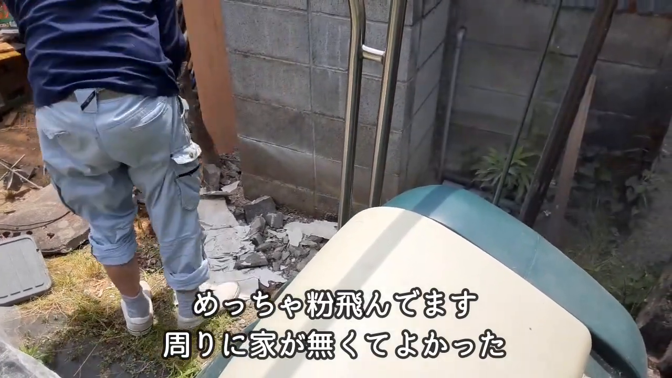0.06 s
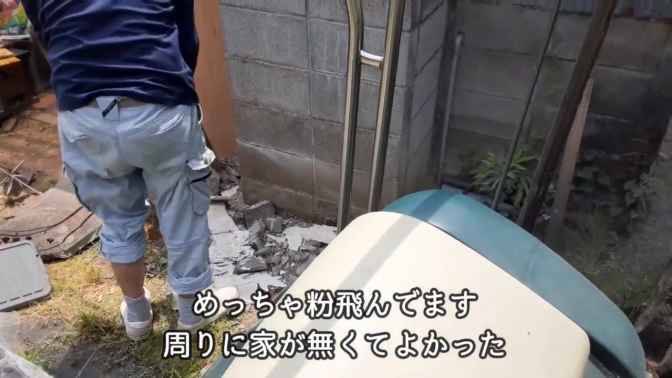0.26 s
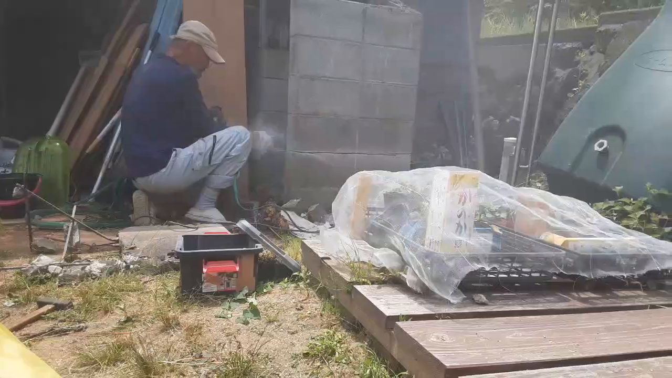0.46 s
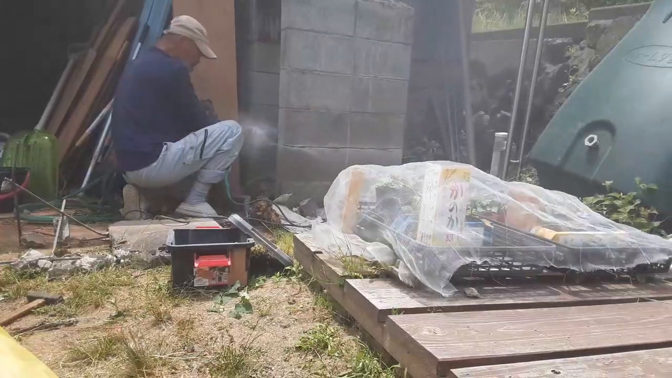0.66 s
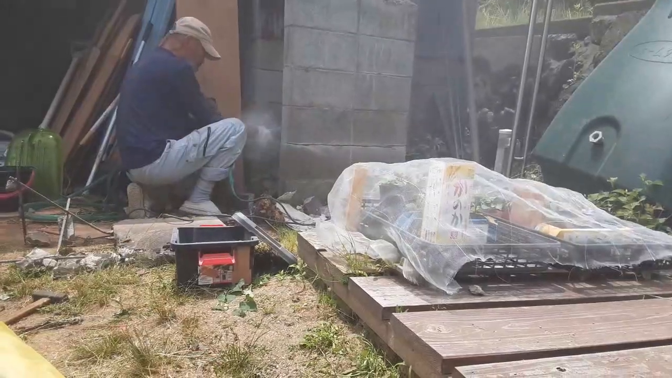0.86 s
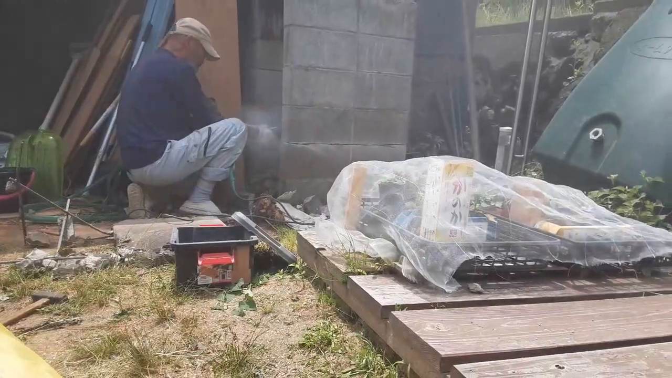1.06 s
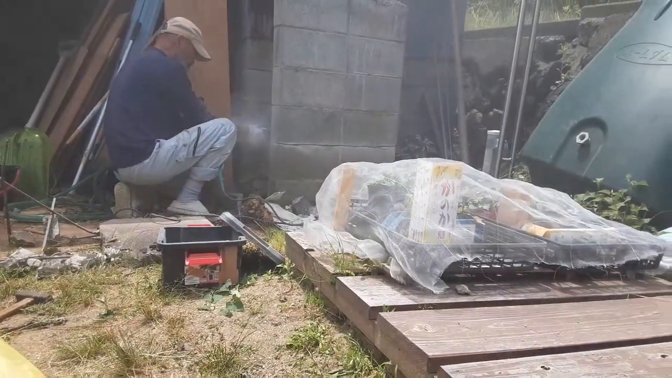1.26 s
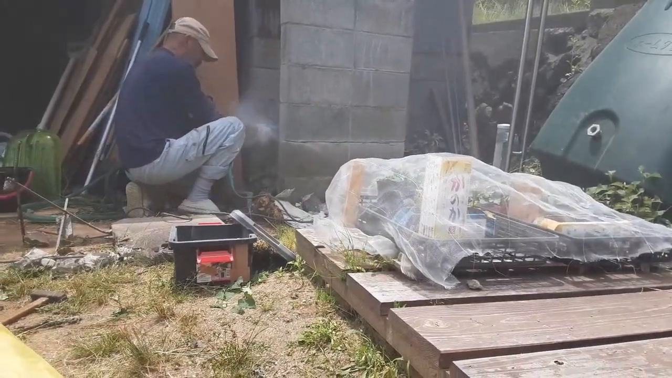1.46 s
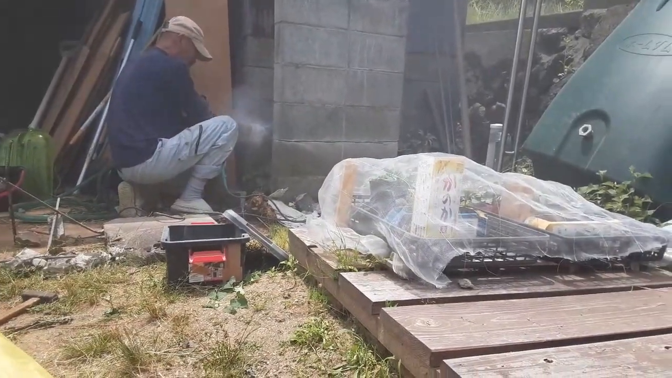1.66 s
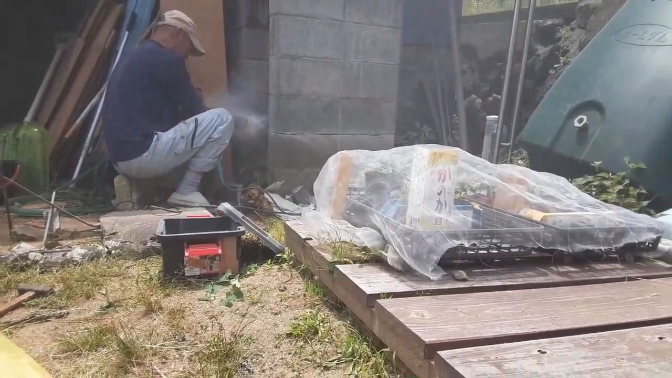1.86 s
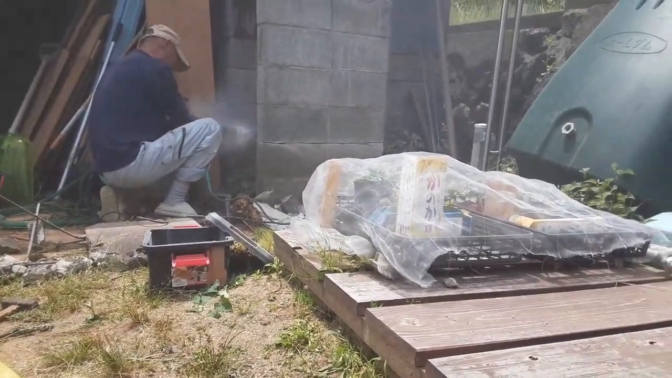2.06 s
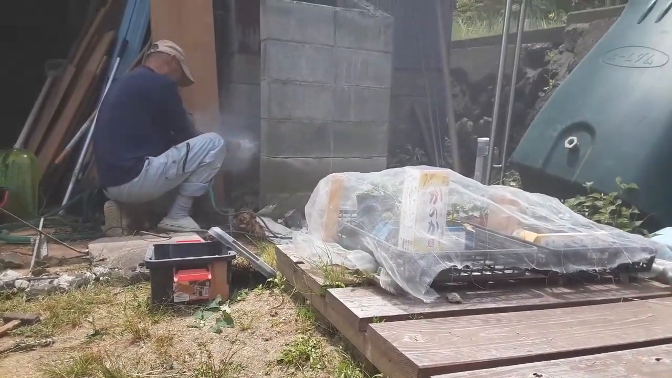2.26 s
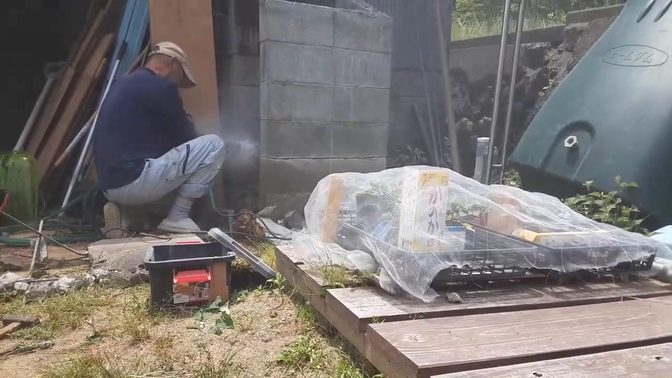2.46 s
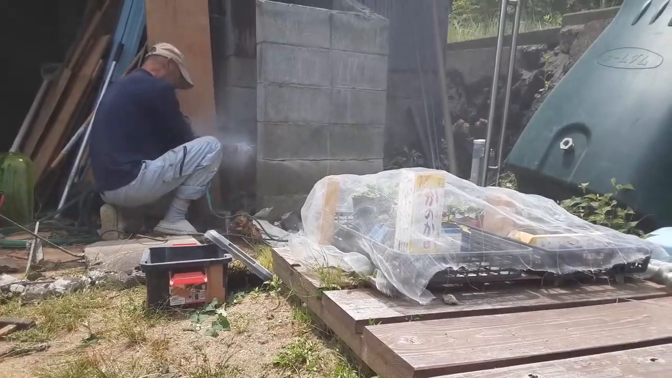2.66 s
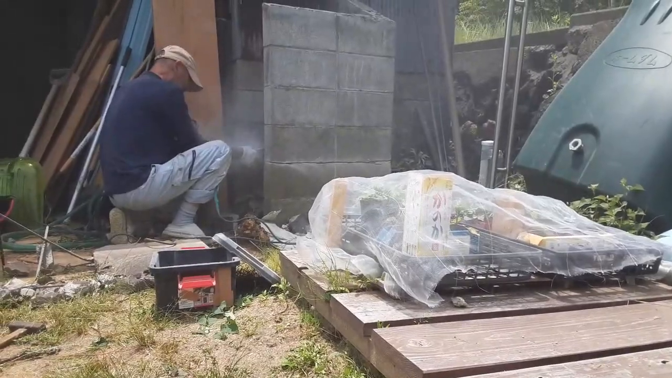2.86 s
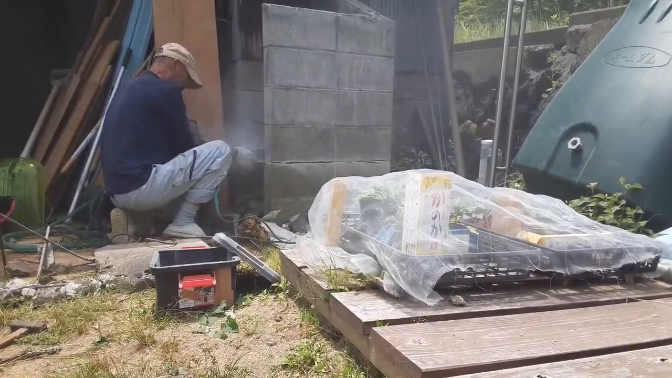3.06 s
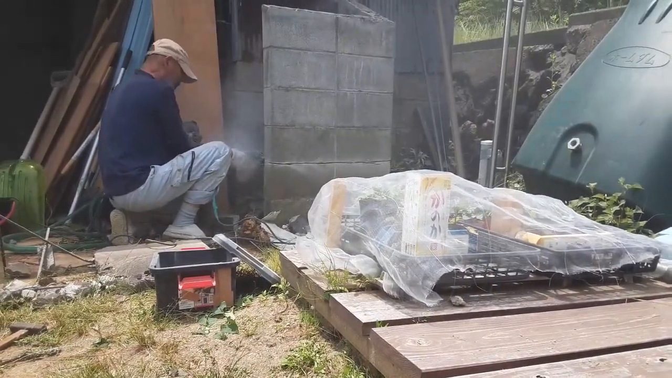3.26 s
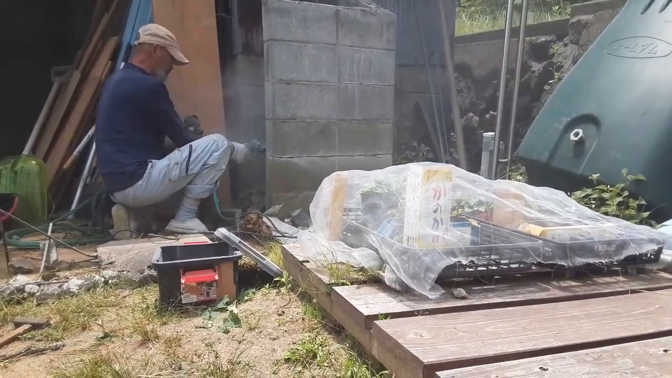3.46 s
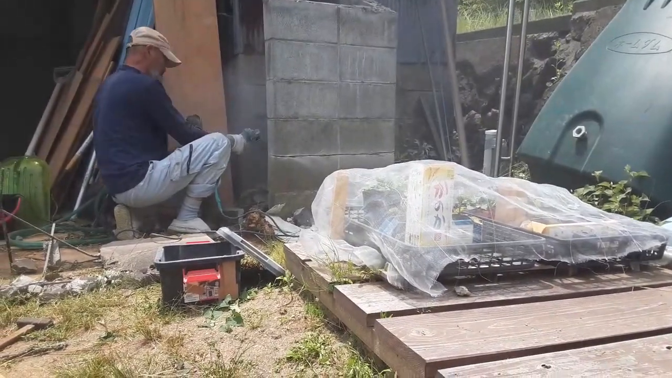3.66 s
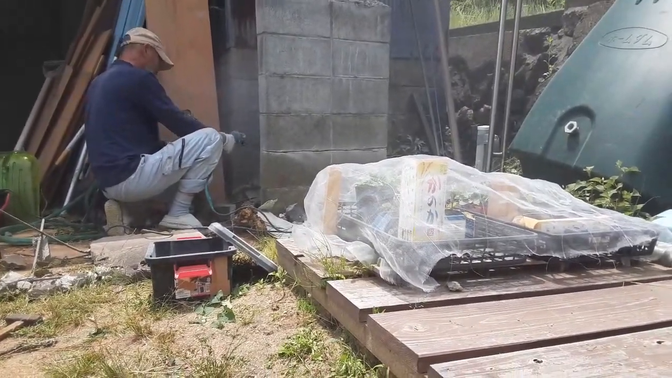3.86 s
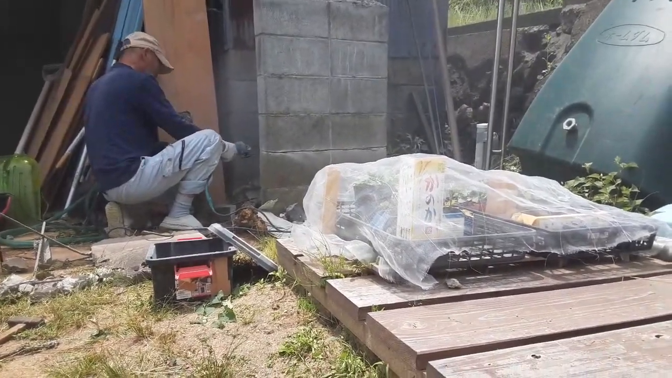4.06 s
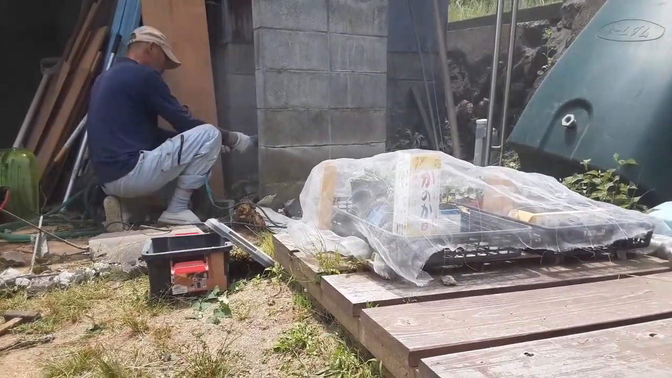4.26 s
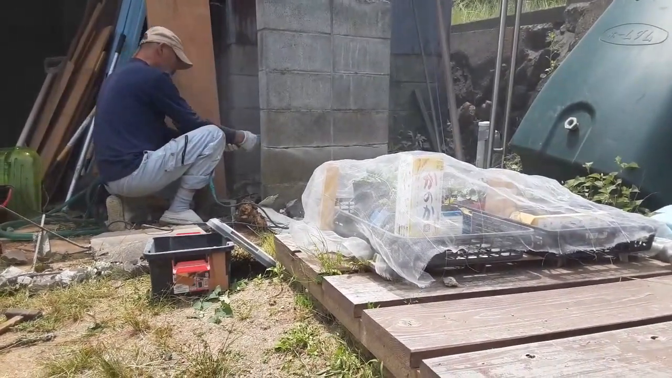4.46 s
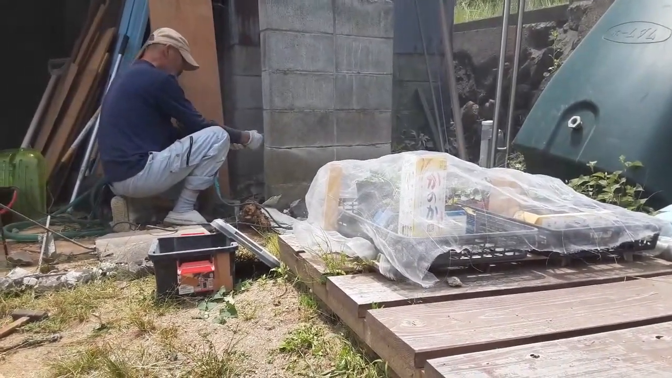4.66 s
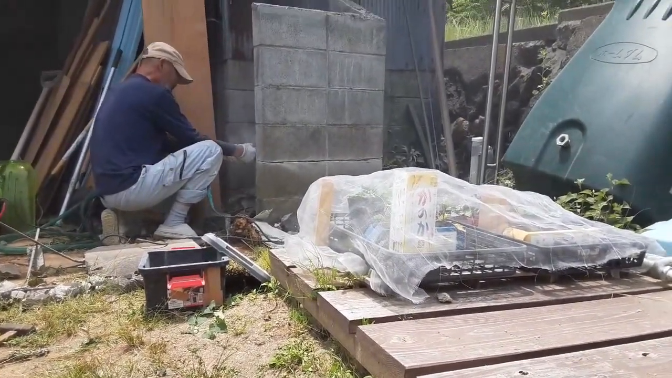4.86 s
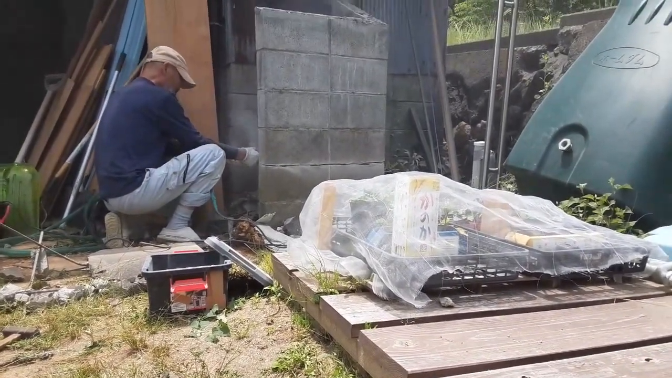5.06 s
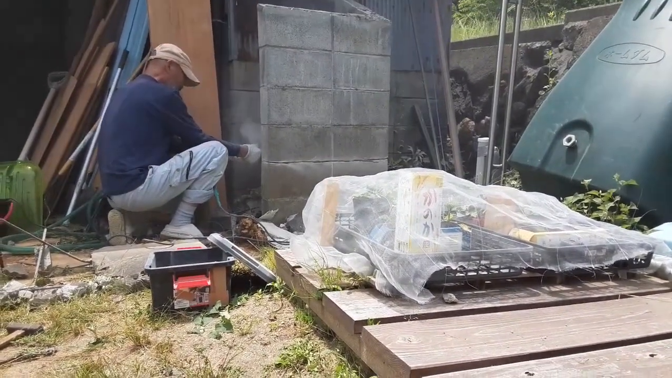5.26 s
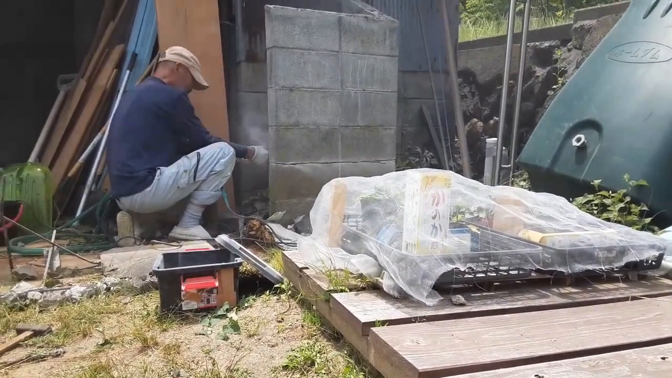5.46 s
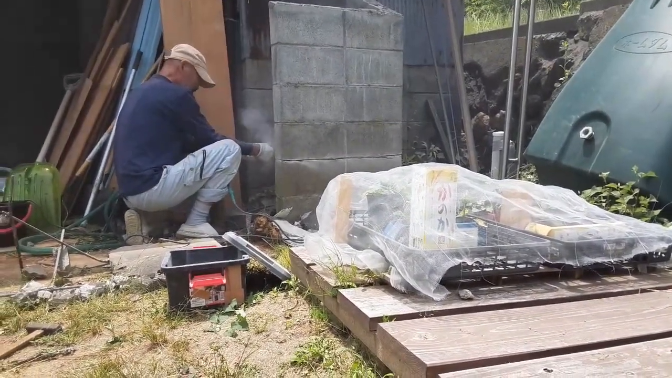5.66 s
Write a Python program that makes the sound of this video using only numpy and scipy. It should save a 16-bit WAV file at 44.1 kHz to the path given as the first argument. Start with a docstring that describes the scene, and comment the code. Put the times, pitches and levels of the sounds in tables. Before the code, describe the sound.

An electric angle grinder spins freely with a rush of fan air and a high whine, over a steady low electrical hum. At about 0.5 seconds the sound dips for an instant and the disc bites sharply into a concrete block wall. The motor slows and a harsh, bright, gritty hiss with metallic ringing carries on until about 3.3 seconds, with thin squeals near 0.6, 1.3 and 3.1 seconds. The disc lifts out, and the hum stops with a click at about 3.6 seconds. The grinder speeds up in a quieter rush of air and rising whine. Around 4.4 to 4.6 seconds it grazes the wall three times, then bites again, slowing, squealing and shuddering slightly as it grinds on to the end at about 5.7 seconds. The tool is heard from across an outdoor yard, with weak, short reflections from the walls.

```python
"""An angle grinder cuts a concrete block wall across a yard: the loaded disc slows, rings and sprays grit. It
squeals where it binds in the slot, and the tool shakes as it is pressed in. The disc lifts out, spins up in a
rush of fan air and motor whine, grazes the wall three times and bites again. A bed of mains hum lies under the
first part and stops with a click."""
import sys
import numpy as np
from scipy import signal
from scipy.fft import rfft, irfft, next_fast_len
from scipy.io import wavfile
from scipy.ndimage import uniform_filter1d, map_coordinates

SR = 44100
rng = np.random.default_rng(int(sys.argv[2]) if len(sys.argv) > 2 else 0)


def materialize(psi):
    """Save the field psi as 16-bit PCM at rate SR to the path in sys.argv[1].

    A 1-D psi becomes a single channel; in a 2-D psi each row is a channel.
    """
    bounded = np.clip(np.atleast_2d(psi).T, -1, 1)
    quanta = np.round(bounded * 32767).astype(np.int16)
    wavfile.write(sys.argv[1], SR, quanta)


N = 251674
T = np.arange(N) / SR

# The motor races when free and sags under load: (time [s], disc speed [turns/s])
DISC_SPEED = [(0, 186), (.44, 196), (.47, 118), (.8, 118), (.95, 128.4), (2.2, 110), (2.8, 119),
              (3.25, 101), (3.42, 131), (3.58, 160), (3.78, 175), (4.05, 186), (4.3, 194), (4.7, 195),
              (5, 152), (5.2, 131), (5.45, 120)]
# The disc is pushed into the wall:
# (start [s], attack [s], let go [s], release [s], low-mode drive [dB], grit spray [dB])
WALL_CUTS = [(.462, 0.015, 0.73, 0.16, -43, -45), (.6, 0.59, 3.292, 0.13, -44, -42.5),
             (4.62, 0.11, 5.8, .1, -46.2, -43.1)]
# The rim knocks, grazes or meets a hard stone:
# (peak time [s], half-width [s], low-mode drive [dB], grit spray [dB])
RIM_TOUCHES = [(0.471, .006, -34, -44.5), (2.047, 0.017, -54, -60), (3.456, .003, -42.5, -60),
               (4.436, .025, -46, -45.5), (4.547, 0.011, -45, -44), (4.632, 0.021, -46.5, -45.5),
               (4.82, 0.018, -43, -53), (4.898, 0.017, -58, -49)]
# Modes of the steel disc:
# (pitch [Hz], width with waver [Hz], level [dB], left-right [dB], pitch shift [Hz per turn/s])
DISC_MODES = [(2046, 150, -8, 0, 0), (2873, 90, -16, 4.5, -2.5), (3360, 130, -11, 3, 0),
              (3843, 150, -13, 17.5, -1), (4570, 180, -12, 10.5, 1), (5064, 69, -5, -4.5, 0),
              (5845, 72, -10, -19, -3), (6528, 142, 1.5, -3.5, 4), (7597, 130, -7.5, 11.5, -3),
              (8550, 46, -7, 13.5, 3.5), (9830, 160, -9, 9.5, -5.5), (11030, 87, -5, 13.5, 4),
              (11980, 390, -4, 1, 2.5), (12560, 78, -7.5, 7, -0.5), (14130, 100, -4, 7, -4),
              (14800, 310, -4.5, 8, 3), (15440, 200, -5, 12, 4)]
# Colour of the flying grit: (frequency [Hz], relative level [dB], left-right [dB])
GRIT_SPECTRUM = [(60, -34, 0), (196.16, -15.5, 3), (795, -23, 6), (1340, -10.5, 3.5), (2300, -4.5, -1.5),
                 (3600, -2, -1), (4100, -4, 5.5), (5050, 0, -3.5), (5520, -10.5, -16), (7000, -5, -4),
                 (8200, -9, 11), (9400, -12.5, 9), (10550, -5, -4), (11700, -2, 1), (13100, -10.5, 5.5),
                 (14400, -2, 13), (15500, -10.5, 1)]
# The disc binds in the slot: (start [s], end [s], pitch [Hz], level [dB], left-right [dB])
DISC_SQUEALS = [(0.456, 0.868, 6476, -41.5, -12), (.58, .79, 4980, -46.5, 2), (1.27, 1.442, 4570, -49.5, 5),
                (1.3, 1.417, 3020, -49.5, 1), (3.02, 3.348, 6420, -47, -10), (2.95, 3.425, 5100, -51, -3),
                (4.38, 4.9, 7450, -61, 12), (4.62, 5, 9700, -54, 10), (4.68, 4.95, 5150, -52.5, -5),
                (4.749, 5.8, 4490, -51, 3), (4.92, 5.6, 5020, -49.5, -5), (5.198, 5.661, 2204, -52.5, 1)]
# The disc spins clear of the slot:
# (start [s], attack [s], back in [s], release [s], air boost [dB], whine boost [dB])
FREE_SPINS = [(-.03, 0.24, 0.48, 0.023, 8.8, 13), (3.88, .27, 4.36, 0.9, 10, 1)]
# Colour of the fan air: (frequency [Hz], relative level [dB], left-right [dB])
FAN_SPECTRUM = [(68, -27, 5), (172, -22.5, -2), (430, -21.5, -1), (670, -14, 1), (874, -12, 3),
                (1013, -5, 0), (1960, -1.8, 2.5), (2830, -1, -4), (3650, -7, 8), (5500, -6.5, -10.5),
                (6900, -4.5, 1), (7840, -13.5, 14.5), (10000, -14, 5.5), (10800, -10.5, 5),
                (13000, -14.5, 6), (15200, -14, 5.5)]
# Housing resonances blown by the fan: (pitch [Hz], width [Hz], level against the air [dB])
HOUSING_MODES = [(1296, 40, -17), (1690, 90, -21.5), (2974, 40, -14.5)]
# Partials of the buzz: (harmonic [multiple of mains frequency], relative level [dB])
MAINS_HARMONICS = [(1, 3.5), (2, -28.5), (3, -15), (4, -34), (5, -26), (6, -52), (7, -38.5), (8, -53),
                   (9, -41.5), (10, -48), (11, -41), (12, -48.5), (13, -40.5)]
# Colour of the rumble on the line: (frequency [Hz], relative level [dB])
LINE_RUMBLE_SPECTRUM = [(8, -23), (20, -4), (45, -2), (100, -8.5), (200, -16.5), (400, -20), (1000, -24),
                        (4000, -33.5)]

FREE_SPEED, CUT_SPEED = 198, 120  # disc turns/s with no load and in a steady cut
MAINS_HZ, HUM_OFF_S = 59.98, 3.5705


def cutting(speed, firm_spray_db=-38.5):
    """Grains of concrete hiss away and keep the steel disc ringing."""
    low, spray = rim_contact()
    load = np.clip((FREE_SPEED - speed) / (FREE_SPEED - CUT_SPEED), 0, 1)
    # the rim chatters in the slot and rubs a little harder once a turn
    chatter = amp(0.58 * wobble(55) + 0.41 * wobble(700)) * (1 + 0.028 * np.sin(angle(speed)))
    # uneven stone tugs at the speed, which bends all modes together
    tug = speed - CUT_SPEED + 3 * wobble(7)
    ring = np.zeros((2, N))
    for hz, width, db, pan_db, shift in DISC_MODES:
        spray_share = np.interp(hz, [6600, 8400], [0, 1]) if hz > 4700 else .6
        drive = low ** (1 - spray_share) * spray ** spray_share * amp(2.1 * wobble(12))
        # waves running with the spin rise in pitch, those running against it fall
        pitch = hz + shift * tug
        # deep in the slot the modes waver, which makes up half of their width
        waver = (.4 + .6 * load) * (20 * wobble(6) + 20 * wobble(45))
        ring += amp(db) * sides(pan_db) * drive * ringing(pitch + waver, width / 2)
    # a light graze mostly rings; a deep cut throws grit
    grit_gain = low ** 0.32 * spray ** 0.62 * amp(-3 * (1.5 - load))
    grit = grit_gain * stone_patches(rush(GRIT_SPECTRUM), depth_db=1.98)
    depth = np.minimum(spray / amp(firm_spray_db), 1) ** 0.26
    return chatter * (amp(-4) * ring + amp(3) * depth * grit)


def rim_contact(surge_db=0.9, surge_hz=12):
    """How hard the rim shakes the disc and how much grit it throws; both surge with the uneven stone."""
    force = sum(amp([[low_db], [spray_db]]) * envelope(*timing)
                for *timing, low_db, spray_db in WALL_CUTS)
    force *= amp(surge_db * np.array([wobble(surge_hz), wobble(surge_hz)]))
    for peak, half_width, low_db, spray_db in RIM_TOUCHES:
        force += amp([[low_db], [spray_db]]) * np.exp(-.5 * ((T - peak) / half_width) ** 2)
    return force


def stone_patches(grit, depth_db, bins=5, frames=12):
    """Pebbles and soft mortar pass the rim: short patches of the spectrum swell and fade."""
    spectrum = signal.stft(grit, nperseg=512)[2]
    patches = uniform_filter1d(rng.standard_normal(spectrum.shape[1:]), bins, axis=0)
    patches = unit(uniform_filter1d(patches, frames, axis=1))
    return unit(signal.istft(spectrum * amp(depth_db * patches), nperseg=512)[1][:, :N])


def squeals():
    """Stick and slip keep one mode of the disc singing for a moment."""
    out = np.zeros((2, N))
    for start, end, hz, db, pan_db in DISC_SQUEALS:
        progress = np.clip((T - start) / (end - start), 0, 1)
        swell = np.sqrt(np.abs(np.sin(np.pi * progress)))
        out += amp(db) * sides(pan_db) * swell * ringing(hz + 14 * wobble(14), 25, skirt_hz=150)
    return out


def motor(speed, gear_ratio=3.23, commutator_bars=24):
    """Fan rush, commutator whine and rotor note grow with speed; rush and whine lift out of the slot."""
    air_boost_db, whine_boost_db = sum(np.array([[air], [whine]]) * envelope(*timing)
                                       for *timing, air, whine in FREE_SPINS)
    octaves_up = np.log2(speed / CUT_SPEED)
    air_db = -56 + 8 * octaves_up + air_boost_db
    whine_db = -72 + 4 * octaves_up + whine_boost_db
    rotor_db = -62.5 - 1.5 * (speed.max() - speed)  # only comes through near top speed
    rotor_hz = gear_ratio * speed * (1 + 0.001 * wobble(36))
    housing = sum(amp(db) * ringing(hz + 12 * wobble(8), width, skirt_hz=119)
                  for hz, width, db in HOUSING_MODES)
    air = amp(air_db + .7 * wobble(30)) * (rush(FAN_SPECTRUM) + housing)
    partials = whine_partial(commutator_bars * rotor_hz) + amp(3) * whine_partial(32 * rotor_hz)
    whine = amp(whine_db + 2.2 * wobble(11)) * sides(7) * partials
    rotor_note = amp(rotor_db) * ringing(rotor_hz, 8.3, skirt_hz=40)
    return air + whine + rotor_note


def whine_partial(hz, case_hz=15100, half_width_hz=450):
    """One partial of the whine flares up as it glides through a resonance of the case."""
    flare = 0.36 + 2.3 / np.hypot(1, (hz - case_hz) / half_width_hz)
    return flare * ringing(hz, 60)


def shaking(speed, judder_speed=141, judder_range=12, flex_hz=538, rumble_hz=112):
    """Pressed on the wall, the tool rumbles; its once-a-turn shake and disc flex peak at one speed."""
    pressed = sum(envelope(*timing) for *timing, _, _ in WALL_CUTS)
    judder = 1 + amp(12) * np.exp(-((speed - judder_speed) / judder_range) ** 2)
    stereo_phase = np.array([[0], [1.1]])
    swing = (speed / FREE_SPEED) ** 2 * np.sqrt(2) * np.sin(angle(speed) + stereo_phase)
    unbalance = amp(-66.5 + 1.9 * wobble(7)) * swing
    flex_gain = amp(-74 + 3.9 * wobble(10)) * speed / CUT_SPEED
    flex = flex_gain * ringing(np.full(N, flex_hz), 22, skirt_hz=60)
    rumble = amp(-73) * ringing(np.full(N, rumble_hz), 45, skirt_hz=30)
    return np.sqrt(pressed) * (judder * (unbalance + flex) + rumble)


def yard(x, reflections=14, wet=.5):
    """Ground, deck and walls send back weak early reflections, different on each side."""
    delay_s = rng.uniform(.003, .035, (2, reflections))
    strength = rng.standard_normal((2, reflections)) * amp(-250 * delay_s)
    echo = np.zeros((2, SR // 20))
    np.put_along_axis(echo, (delay_s * SR).astype(int), strength, axis=1)
    echo *= wet / np.linalg.norm(echo, axis=1, keepdims=True)
    return 0.93 * (x + signal.fftconvolve(x, echo, axes=1)[:, :N])


def mains_hum(buzz_db=-32, rumble_db=-53, offset=.031):
    """Mains buzz and rumble ride on a steady offset, so they stop with a click."""
    phase = 2 * np.pi * MAINS_HZ * (T - HUM_OFF_S) + 0.28
    buzz = unit(sum(amp(db) * np.sin(harmonic * phase) for harmonic, db in MAINS_HARMONICS))
    rumble = unit(filtered(rng.standard_normal(N), lambda hz: amp(eq_curve(LINE_RUMBLE_SPECTRUM, hz)[0])))
    return (amp(buzz_db) * buzz + amp(rumble_db) * rumble + offset) * (T < HUM_OFF_S)


def ringing(hz, width_hz, skirt_hz=500):
    """A mode struck by countless tiny hits: a tone whose level and phase drift at random."""
    f = np.fft.fftfreq(next_fast_len(N), 1 / SR)
    strikes = rng.standard_normal((2, 2 * len(f)), np.float32).view(np.complex64)
    rolloff = (1 + 2j * f / width_hz) * (1 + 1j * f / skirt_hz)
    drift = np.fft.ifft((strikes / rolloff).astype(np.complex64))[:, :N]
    phase = angle(hz)
    return unit(drift.real * np.cos(phase) - drift.imag * np.sin(phase))


def rush(spectrum):
    """Noise scattered by the yard: unrelated and differently coloured on each side."""
    def colour(hz):
        db, pan_db = eq_curve(spectrum, hz)
        return amp(db) * sides(pan_db)
    return unit(filtered(rng.standard_normal((2, N)), colour))


def eq_curve(spectrum, hz):
    """Columns of a spectrum table, read on a log frequency axis."""
    points_hz, *columns = np.transpose(spectrum)
    return [np.interp(np.log(hz + 1), np.log(points_hz), column) for column in columns]


def filtered(x, response):
    """Equalise x with a gain given as a function of frequency."""
    size = next_fast_len(N + 8192)
    return irfft(rfft(x, size) * response(np.fft.rfftfreq(size, 1 / SR)), size)[..., :N]


def envelope(start, attack, end, release):
    """Rise, hold and fall between 0 and 1."""
    return np.clip((T - start) / attack, 0, 1) * np.clip(1 - (T - end) / release, 0, 1)


def wobble(rate):
    """Smooth random modulation, rate new values a second."""
    return map_coordinates(rng.standard_normal(int(N * rate / SR) + 4), [T * rate])


def angle(hz):
    """Running phase of a gliding pitch."""
    return 2 * np.pi * np.cumsum(hz) / SR


def sides(db):
    """Pan gains that put the left side db above the right."""
    return amp(np.array([[.5], [-.5]]) * db)


def amp(db):
    """Decibels to gain."""
    return 10 ** (np.asarray(db) / 20)


def unit(x):
    """Scale to rms 1."""
    return x / np.sqrt(np.mean(np.abs(x) ** 2) + 1e-20)


def scene(dip_start_s=.439, dip_end_s=.465):
    """The grinder in the yard, with the level dipping briefly just before the first bite, and the hum in the
    centre."""
    speed = np.interp(T, *np.transpose(DISC_SPEED))
    grinder = cutting(speed) + squeals() + motor(speed) + shaking(speed)
    in_dip = (T > dip_start_s) & (T < dip_end_s)
    dip_db = -20 * uniform_filter1d(in_dip.astype(float), size=180)
    return amp(dip_db) * yard(grinder) + mains_hum()


def record(dry, cutoff_hz=15780):
    """A brick-wall low-pass takes off the very top."""
    return filtered(dry, lambda hz: hz < cutoff_hz)


dry = scene()
out = record(dry)
materialize(out)
```